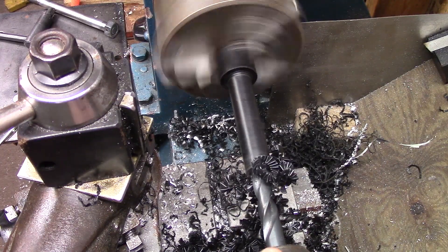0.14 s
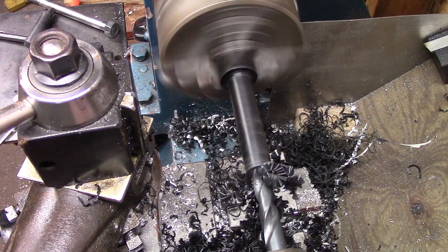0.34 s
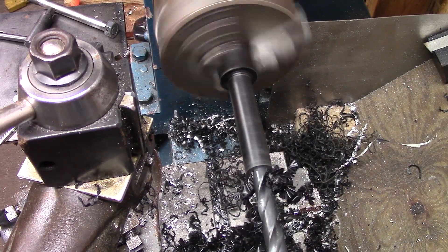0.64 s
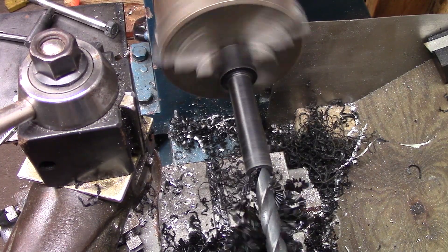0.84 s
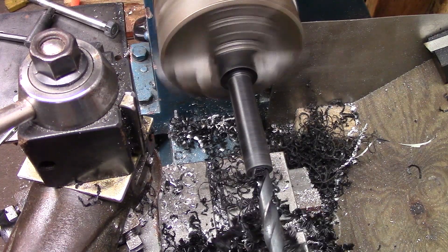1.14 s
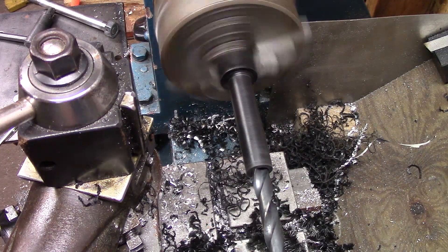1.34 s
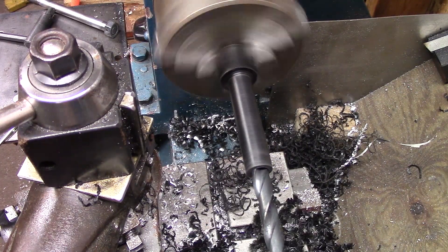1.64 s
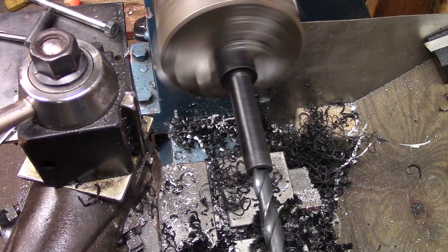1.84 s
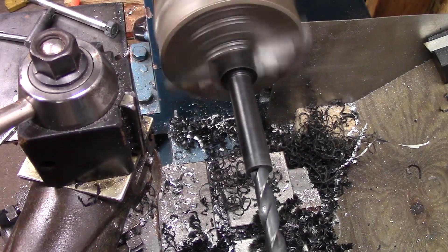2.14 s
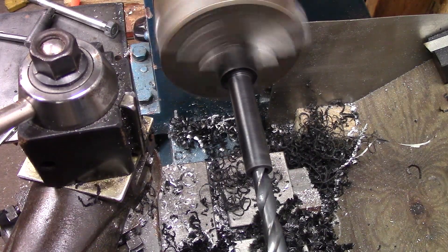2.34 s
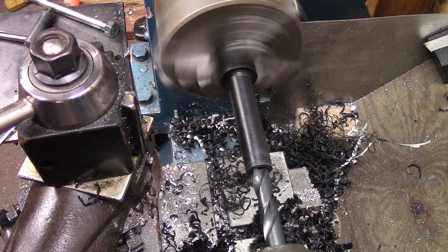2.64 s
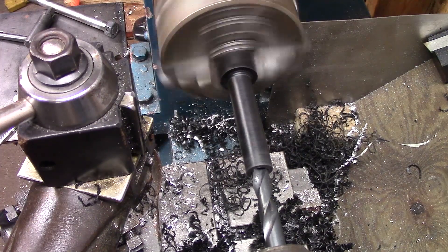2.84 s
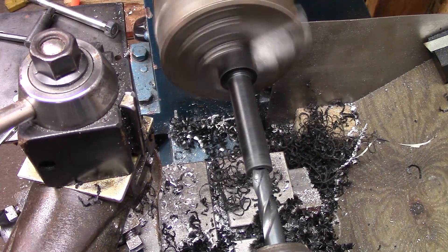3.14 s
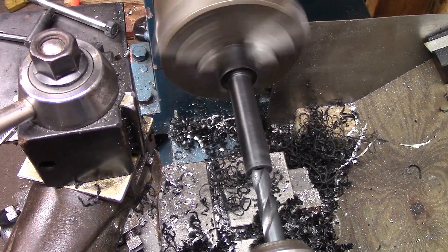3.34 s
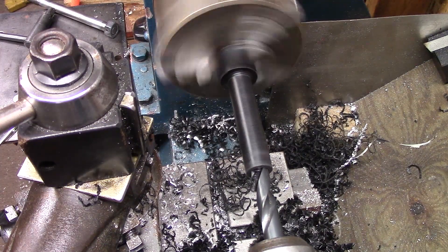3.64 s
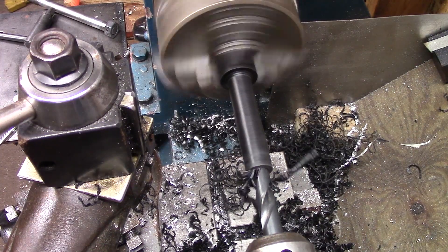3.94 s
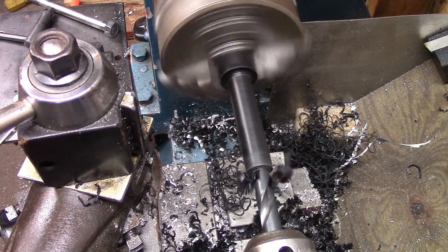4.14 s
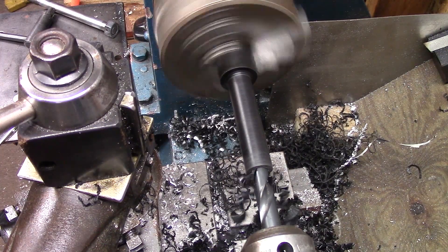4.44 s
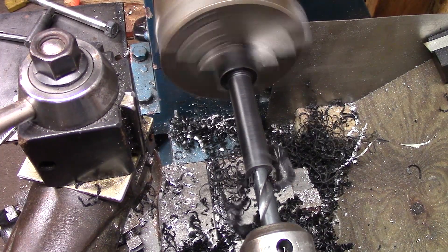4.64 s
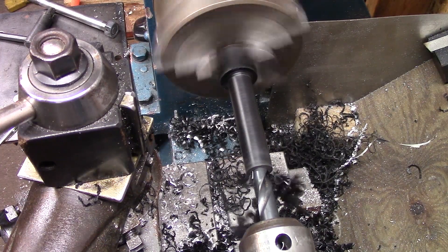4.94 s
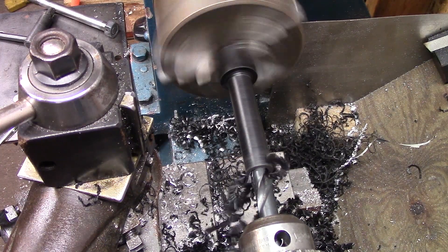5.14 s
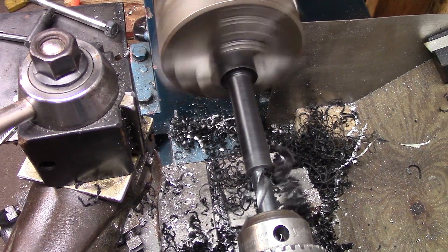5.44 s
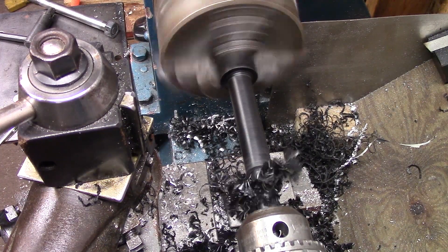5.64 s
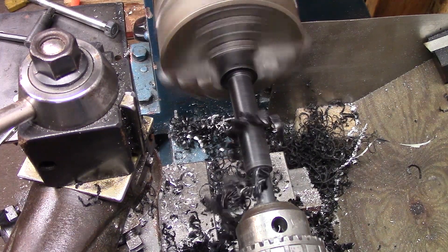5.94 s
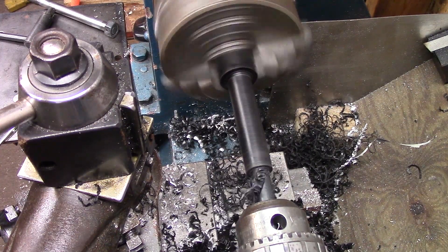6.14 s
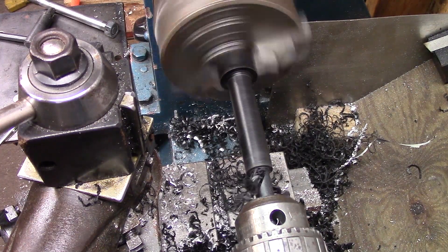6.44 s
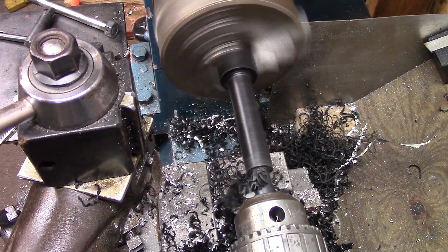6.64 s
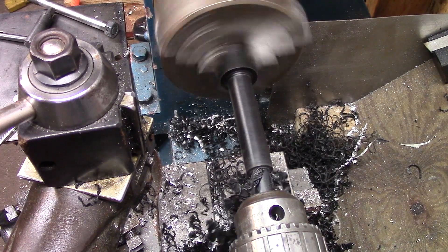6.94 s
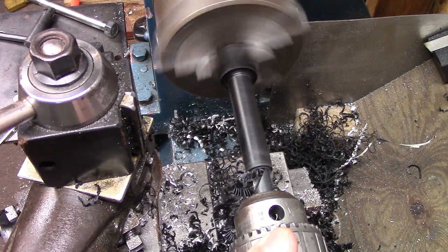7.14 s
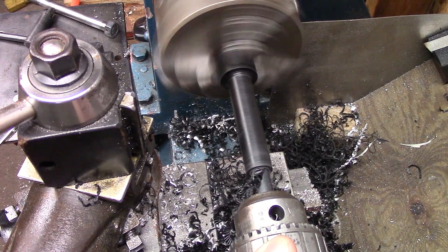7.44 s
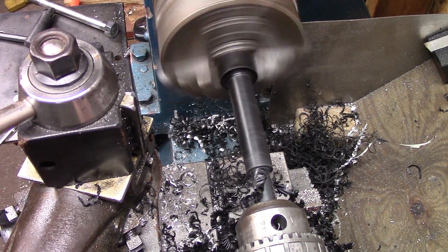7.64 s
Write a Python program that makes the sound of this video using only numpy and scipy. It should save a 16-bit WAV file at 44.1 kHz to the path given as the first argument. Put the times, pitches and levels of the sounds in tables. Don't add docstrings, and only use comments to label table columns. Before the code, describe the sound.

A small lathe runs throughout in a workshop, heard close in stereo: low mains hum, steady gear whine and rough broadband rumble of bearings and belt. At 0 s a very high squeal throbs about 37 times a second with light hiss, stopping near 0.5 s; two tiny chirps follow. The machine drones alone, with faint ticks at 1.2 and 1.7 s. From 2.05 to 2.76 s the handwheel rattles in a dozen even ticks, about sixteen per second. The background dips under automatic gain as hiss enters around 3 s. From 3.5 to 5.9 s short shrill squeals overlap, mostly sliding upward, with sharp grips near 4.2 and 5.2 s and thickening swarf hiss. From 5.85 s a steady, piercing harmonic squeal near 2.5 kHz sags slightly and holds to 7.7 s. Rapid high chirps stutter from 6.76 to 7.26 s, ducking the machine, and return briefly at 7.65 s.

```python
import sys
import numpy as np
from scipy import signal
from scipy.fft import rfft, irfft, next_fast_len
from scipy.io import wavfile
from scipy.ndimage import uniform_filter1d, minimum_filter1d, map_coordinates

SR = 44100
rng = np.random.default_rng(int(sys.argv[2]) if len(sys.argv) > 2 else 0)


def generate_wav(sig):
    pcm = np.round(np.clip(np.atleast_2d(sig).T, -1, 1) * 32767).astype(np.int16)
    wavfile.write(sys.argv[1], SR, pcm)


def attenuation_scalar(level_db):
    decades = np.asarray(level_db, float) / 20
    return 10 ** decades


N = 343531
T = np.arange(N) / SR
SIDES = np.array([[1], [-1]])

# time in seconds, speed in turns per second.
SHAFT = [(0, 23.29), (.5, 23.34), (1.5, 23.37), (3.0, 23.37), (3.5, 23.31), (4.5, 23.28), (6.5, 23.26),
         (7.79, 23.3)]
# time in seconds, fundamental in Hz, level in dB.
RUB = [
    (5.84, 2502, -2.5),
    (6.85, 2443, -1),
    (7.4, 2432, -2.5),
    (7.74, 2418, -1.5),
]


def rms_one(x):
    return x / np.sqrt(np.mean(np.abs(x) ** 2) + 1e-20)


def columns(rows, t):
    s, *rest = np.transpose(rows)
    return [np.interp(t, s, c) for c in rest]


def drift(rate_hz, size):
    pole = np.exp(-32 * np.pi * rate_hz / SR)
    noise = rng.standard_normal(size // 16 + 502)
    slow = signal.lfilter([1], [1, -2 * pole, pole * pole], noise)[500:]
    return np.interp(np.arange(size) / 16, np.arange(len(slow)), rms_one(slow))


def patches(across, along):
    field = rng.standard_normal((256, 256))
    return map_coordinates(field, [across % 255, along % 255], order=1)


def coloured(points):
    hz, db = np.transpose(points)
    length = next_fast_len(N)
    bins = np.fft.rfftfreq(length, 1 / SR) + 1
    shape = attenuation_scalar(np.interp(np.log(bins), np.log(hz), db))
    spectrum = rfft(rng.standard_normal(N), length) * shape
    return rms_one(irfft(spectrum, length)[:N])


def rough_tone(hz, width_hz, clean, sway=1.1):
    wander = (drift(width_hz, size=len(hz)) + 1j * drift(width_hz, size=len(hz))) / np.sqrt(2)
    lead = np.pi / 2 + sway * drift(80, size=len(hz))
    carrier = np.exp(2j * np.pi * np.cumsum(hz) / SR + .5j * lead * SIDES)
    clean = np.clip(clean, 0, 1)
    return 2 * np.real(carrier * (np.sqrt(clean) + np.sqrt(1 - clean) * wander))


def bursts(rows, rise_s, fall_s):
    t = np.arange(round(.06 * SR)) / SR
    shape = (1 - np.exp(-(t / rise_s) ** 2)) * np.exp(-t / fall_s)
    marks = np.zeros(N)
    marks[[round(row[0] * SR) for row in rows]] = attenuation_scalar(np.array(rows)[:, 1])
    return signal.fftconvolve(marks, shape / shape.max())[:N]


def add(out, rows, voice):
    first, last = round(rows[0][0] * SR), min(round(rows[-1][0] * SR), N)
    t = T[first:last]
    since_start = t - t[0] + (first < 600)
    until_end = t[-1] - t + (last > N - 300)
    fade = np.clip(np.minimum(since_start, until_end) / .02, 0, 1)
    out[..., first:last] += fade * voice(t, *columns(rows, t))


def squeals():
    # start in seconds, length in seconds, first and last pitch in Hz, level in dB.
    leaving = [(0, 0.44, 8130, 8670, -26), (0, 0.51, 6030, 7180, -30.5), (.04, .41, 12600, 14200, -40.5),
               (.6, .07, 10400, 9900, -46), (.01, 0.044, 9700, 10000, -33),
               (3.47, .19, 11300, 13200, -41.5), (3.65, 0.15, 13400, 15800, -36),
               (3.36, .26, 6900, 7300, -49), (3.8, .09, 8000, 9600, -33), (3.78, .2, 5500, 5750, -33),
               (4.1, .1, 10600, 11000, -33)]
    boring = [(5.3, 0.23, 5700, 5600, -31), (3.61, 0.22, 6250, 7450, -29.5),
              (3.78, .35, 6300, 9300, -28.5), (3.89, 0.26, 6800, 8100, -30), (4.13, .2, 8100, 10100, -25),
              (4.03, 0.21, 14100, 15200, -35), (4.14, .13, 6950, 7600, -24),
              (4.25, .21, 8300, 10900, -24.5), (4.34, .19, 6600, 8400, -27),
              (4.34, 0.18, 5300, 6250, -27), (4.55, .2, 6700, 8000, -26), (4.53, .11, 9800, 9950, -23.5),
              (4.52, .23, 4900, 5900, -25), (4.76, .26, 6500, 8600, -28.5),
              (4.9, 0.24, 9000, 10000, -24.5), (5.06, 0.13, 10400, 11800, -22.5),
              (5.4, .13, 4900, 6100, -31.5), (5.1, .18, 7600, 10400, -29.5),
              (5.27, .29, 10400, 9900, -27.5), (5.14, .25, 5400, 7200, -28), (5.4, .18, 4900, 5200, -23),
              (5.55, .3, 9200, 12000, -32), (5.66, .16, 9200, 9750, -31.5), (5.66, 0.29, 5900, 5400, -31),
              (4.5, .12, 9900, 11000, -30), (4.72, .16, 8600, 9900, -30), (5.68, .2, 11000, 12600, -33),
              (5.85, .38, 5450, 5750, -33), (6.2, .56, 5550, 5600, -36), (6.99, .1, 10500, 10800, -36),
              (7.0, .12, 5360, 5520, -32.5), (5.33, .1, 4400, 4700, -30), (7.73, 0.066, 10000, 10700, -31),
              (7.73, 0.063, 12400, 12800, -35)]
    # time of a peak in seconds, depth in dB, warble in Hz.
    throbs = [(.051, 20, 50), (.064, 7, 230), (.066, 16, 90)]
    flute_hz = 37.2
    out = np.zeros((2, N))
    for k, (start, length, from_hz, to_hz, db) in enumerate(leaving + boring):
        throbbing = k < len(throbs)
        peak_s, depth_db, warble_hz = throbs[k] if throbbing else (0, 0, 0)
        grip_spread_db, width_hz, clean = (1.5, 110, .7) if throbbing else (2.6, 190, .4)
        slow_jitter_hz = 0 if throbbing else 60
        end_drop_db = 1.8 if throbbing else 6

        def voice(t, hz, side):
            flute = 2 * np.pi * flute_hz * (t - peak_s)
            grip_db = depth_db * (np.cos(flute) - .5) / 2 + grip_spread_db * drift(55, size=len(t))
            jitter_hz = 80 * drift(40, size=len(t)) + slow_jitter_hz * drift(9, size=len(t))
            hz = hz + warble_hz * np.sin(flute) + jitter_hz
            swell_db = -end_drop_db * np.abs(side) ** 3.2
            return attenuation_scalar(db + swell_db + grip_db - 3) * rough_tone(hz, width_hz, clean=clean)
        add(out, [(start, from_hz, -1), (start + length, to_hz, 1)], voice)
    return out


def chuck_rub():
    # multiple of the fundamental, level in dB.
    partials = [(1, -14), (2, -5.5), (3, -1), (4, 1.5), (5, -1.5), (6, -8.5)]

    def voice(t, hz, db):
        hz = hz + 12.34 * drift(41, size=len(t))
        stack = 0
        for multiple, part_db in partials:
            level = attenuation_scalar(db + gain_db(t) + part_db + 1.3 * drift(43, size=len(t)))
            stack = stack + level * rough_tone(multiple * hz, 57, clean=0.88, sway=.7)
        return stack
    out = np.zeros((2, N))
    add(out, RUB, voice)
    return out


def chirps():
    # time in seconds, peak level in dB, pitch in Hz.
    snaps = [(0.6135, -36, 10400), (0.6554, -38, 9700), (4.1644, -12, 7210), (4.1899, -20, 7320),
             (4.2654, -18, 9640), (4.2974, -18, 8940), (4.3061, -21, 9700), (4.593, -18.5, 10100),
             (5.24, -10.5, 9800)]
    corner = [(6.764, -23, 5720), (6.787, -23, 5670), (6.8114, -24, 5700), (6.8398, -19, 5630),
              (6.8646, -13.5, 5560), (6.8917, -19, 5530), (6.9207, -14.5, 5460), (6.9491, -24, 5450),
              (6.9755, -25, 5400), (7.0064, -21, 5320), (7.02, -24, 5400), (7.032, -19, 5460),
              (7.0459, -19, 5420), (7.063, -22, 5510), (7.0783, -27, 5300), (7.0997, -18.5, 5500),
              (7.1225, -19, 5550), (7.151, -16, 5630), (7.177, -13, 5600), (7.2063, -21, 5500),
              (7.231, -21, 5460), (7.259, -18, 5480), (7.2886, -37, 5400), (7.3156, -37, 5440),
              (7.654, -29, 4900), (7.6772, -25, 5450), (7.701, -21, 4930), (7.731, -22, 5360),
              (7.756, -28, 5300)]
    catches = snaps + corner
    s, _, hz = np.transpose(catches)
    pitch = hz[np.clip(np.searchsorted(s, T) - 1, 0, None)]
    octave = rough_tone(np.minimum(2 * pitch, 15000), 300, clean=.2)
    tone = rough_tone(pitch, 170, clean=.92, sway=.3) + attenuation_scalar(-19) * octave
    return attenuation_scalar(-5.5) * bursts(catches, rise_s=.008, fall_s=.0035) * tone


def cut_hiss():
    # time in seconds, level in dB.
    pressure = [
        [(0.0, -11), (0.174, -13.5), (0.44, -16.5), (0.6, -31)],
        [(2.75, -37), (3.06, -17), (3.55, -7.5), (3.83, -2), (4.12, -2), (4.4, 3), (5.41, 9), (5.7, 4.5),
         (5.87, 4.5)],
        [(5.85, 4.5), (6.8, 8), (7.2, 7.5), (7.46, -1.5), (7.79, -1.5)],
    ]
    # frequency in Hz, density in dB per Hz.
    hiss_spectrum = [(2000, -28), (3300, -15), (3900, -22), (4400, -8), (5700, -2.5), (6500, -8),
                     (7300, -4), (12500, 1), (15000, -3), (16500, -37)]
    # time in seconds, streak depth in dB.
    streak_depth = [(0, 2), (3.5, 2), (3.7, 4.5), (5.7, 4.5), (5.9, 2)]
    # time in seconds, treble lift in dB.
    brightness = [(.5, -9), (3.0, -12.5), (5.1, -10.5), (5.45, -3)]
    hz, s, cells = signal.stft(coloured(hiss_spectrum), SR, nperseg=512)
    s, hz = np.meshgrid(s, hz)
    bottom_s = RUB[0][0]
    climb_hz = 7000 * np.minimum(s, bottom_s)
    surge_hz = 400 * np.sin(2 * np.pi * 2.6 * s) * (s < bottom_s)
    streak_db = columns(streak_depth, s)[0] * patches((hz - climb_hz - surge_hz) / 330, s / .07)
    treble_db = columns(brightness, s)[0] * np.clip((hz - 9000) / 4000, 0, 1)
    noise = signal.istft(cells * attenuation_scalar(streak_db + treble_db), SR, nperseg=512)[1]
    noise = noise[:N] * attenuation_scalar(1.4 * drift(50, size=N))

    def voice(t, db):
        first = round(t[0] * SR)
        return attenuation_scalar(db + gain_db(t) - 1.5) * noise[first:first + len(t)]
    out = np.zeros(N)
    for rows in pressure:
        add(out, rows, voice)
    return out


def handwheel():
    # time in seconds, peak level in dB, level of the low part in dB to the peak.
    ticks = [(1.156, -30, 7), (1.7202, -34, 11), (2.046, -19.5, 1.5), (2.1196, -21, 1.5), (2.191, -20, -4),
             (2.254, -23, 10), (2.316, -20.5, -1.5), (2.3814, -18.5, 2), (2.444, -19.5, -3),
             (2.505, -24.5, 0), (2.5684, -19, 1.5), (2.6303, -18, -2.5), (2.694, -22, 4.5),
             (2.7613, -20.5, -1), (3.052, -32.5, 1)]
    # frequency in Hz, density in dB per Hz.
    tick_spectrum = [(2060, -36), (3500, -71), (4930, 2.5), (6240, 7.5), (8860, 1.5), (9810, 3.5),
                     (16000, -8)]
    knock_band = signal.butter(2, [900, 3300], "band", fs=SR, output="sos")
    knock = rms_one(signal.sosfilt(knock_band, rng.standard_normal(N)))
    bright = coloured(tick_spectrum)
    low = bursts([(s, db + low_db) for s, db, low_db in ticks], rise_s=.004, fall_s=.004)
    rattle = bursts(ticks, rise_s=0.0021, fall_s=0.0032)
    rattle = rattle + attenuation_scalar(-24.0) * bursts(ticks, rise_s=0.0097, fall_s=0.066)
    return attenuation_scalar(-12) * rattle * bright + attenuation_scalar(-7) * low * knock


def motor_tones():
    # time in seconds, hum in dB, its second harmonic in dB.
    load = [(0, -14, -24.5), (1.08, -14, -25), (1.22, -9, -26), (2.3, -15, -22), (3.3, -10.5, -27),
            (4.8, -8, -21), (6.75, -10.5, -13), (6.95, -9, -24), (7.79, -11, -27)]
    # multiple of whine, multiples of hum added, level in dB to whine, left lead in radians.
    gear = [(1, 0, 0, 1.52), (1, 1, -6.0, 0), (2, 0, -5.0, 1.52), (.4263, 0, -12, 1.4),
            (1.304, 0, -17, -.3), (1.9667, 0, -10, -1.4)]
    hum_hz, teeth, whine_level_db = 120.0, 33.2, -10
    hum_db, second_db = columns(load, T) + gain_db(T)
    whine_db = gain_db(T) + whine_level_db
    hum, whine = 2 * np.pi * hum_hz * T, 2 * np.pi * teeth * shaft_turns()
    out = attenuation_scalar(hum_db + 1) * np.sin(hum) * np.ones((2, 1))
    out += attenuation_scalar(second_db + 1.5) * rough_tone(np.full(N, 2 * hum_hz), 4.6, clean=0.56)
    for mesh, mains, db, lead in gear:
        level = attenuation_scalar(whine_db + db + 6 + 0.47 * drift(8.1, size=N)) / np.cos(lead / 2)
        out += level * np.sin(mesh * whine + mains * hum + lead / 2 * SIDES)
    return out


def rumble():
    # frequency in Hz, density in dB per Hz.
    rumble_spectrum = [(15, -50), (30, -41), (90, -26.5), (150, -21), (190, -15.5), (225, -17.5),
                       (476, -5.5), (641, -8.5), (720, -3.5), (830, -9), (1210, -16), (1520, -9),
                       (1750, -18), (2990, -17.5), (4200, -29.5), (16000, -45)]
    # shaft order, lift in dB.
    casing_orders = [(5, -30), (8, 5), (11, 4), (21, 6), (29, 4), (30, 7), (32, 5), (33, -30), (47, 5),
                     (56, 6), (66, -30)]
    rumble_db = -0.23
    orders = np.arange(1, 180)
    hz, db = np.transpose(rumble_spectrum)
    level_db = np.interp(np.log(orders * SHAFT[0][1]), np.log(hz), db) + rng.normal(0, 2.1, len(orders))
    for order, lift_db in casing_orders:
        level_db[int(order) - 1] += lift_db
    place = (shaft_turns() % 1 * 8192).astype(int)
    pattern = 0
    for _ in range(2):
        phase = np.exp(2j * np.pi * rng.random(len(orders)))
        cycle = irfft(np.r_[0, attenuation_scalar(level_db) * phase], 8192)
        pattern = pattern + attenuation_scalar(1.8 * drift(2.5, size=N)) * cycle[place]
    no_bass = signal.butter(1, 60.0, "high", fs=SR, output="sos")
    side = signal.sosfilt(no_bass, coloured(rumble_spectrum))
    broad = attenuation_scalar(-6.0 + 0.22 * drift(24, size=N)) * (coloured(rumble_spectrum) + side * SIDES)
    level = attenuation_scalar(gain_db(T) + rumble_db)
    return level * broad, level * attenuation_scalar(-7.0) * rms_one(pattern)


def shaft_turns():
    return np.cumsum(columns(SHAFT, T)[0]) / SR


def microphones(x, patch_hz, patch_s):
    hz, s, cells = signal.stft(x, SR, nperseg=1024)
    s, hz = np.meshgrid(s, hz)
    turn = np.exp(2.2j * patches(hz / patch_hz, s / patch_s) * hz / (hz + 40))
    return signal.istft([cells * turn, cells / turn], SR, nperseg=1024)[1][:, :N] * np.sqrt(2)


def gain_db(t):
    # time in seconds, gain in dB.
    pumping = [(0, -23), (.56, -23.5), (1.78, -24.5), (2.41, -22.5), (2.75, -32.5), (3.51, -34),
               (3.88, -27), (4.12, -23.5), (4.4, -29.5), (4.85, -27), (5.12, -30), (5.64, -32.5),
               (6.45, -34.5), (6.83, -33.5), (6.865, -41.5), (7.27, -43.5), (7.55, -38), (7.79, -33)]
    return columns(pumping, t)[0]


def silence_masked(x, margin_db, mask_db, top_hz, top_db):
    hz, _, cells = signal.stft(x, SR, nperseg=1024)
    bands = cells[:, :512].reshape(2, 64, 8, -1)
    power = uniform_filter1d(np.mean(np.abs(bands) ** 2, axis=(0, 2)), size=3)
    level_db = 10 * np.log10(power + 1e-14)
    centre = hz[4:512:8, None]
    treble_db = 10 * np.log10(np.mean(10 ** (level_db[10:36] / 10), axis=0))
    need_db = treble_db - margin_db + top_db * np.clip((centre - top_hz) / 3000, 0, None)
    loud_neighbour_db = -minimum_filter1d(-level_db, size=7, axis=0, origin=2)
    need_db = np.maximum(need_db, loud_neighbour_db - mask_db)
    audible = 1 / (1 + attenuation_scalar(np.clip(8 * (need_db - level_db), -80, 80)))
    keep = np.where(centre > 3800, audible, 1)
    cells[:, :512] *= np.repeat(keep, 8, axis=0)
    return signal.istft(cells, SR, nperseg=1024)[1][:, :N]


def scene():
    broad, pattern = rumble()
    steady = broad + microphones(pattern + cut_hiss(), patch_hz=40, patch_s=.11)
    ticks = microphones(handwheel(), patch_hz=150, patch_s=.1)
    return steady + ticks + squeals() + chuck_rub() + chirps() + motor_tones()


def band_limit(x):
    return signal.sosfilt(signal.butter(12, 16460, fs=SR, output="sos"), x)


def record(dry):
    thinned = silence_masked(dry, margin_db=18.5, mask_db=21, top_hz=12500, top_db=8)
    return band_limit(thinned)


dry = scene()
out = record(dry)
generate_wav(out)
```